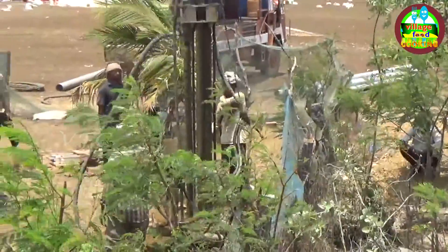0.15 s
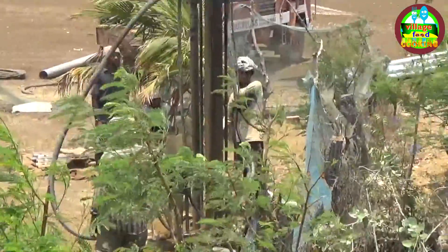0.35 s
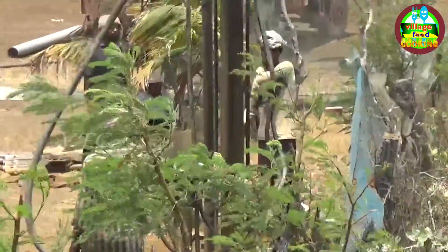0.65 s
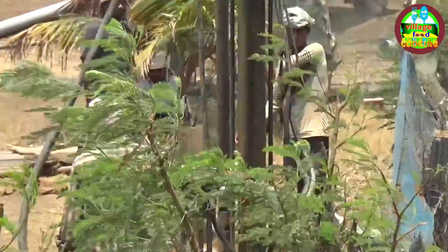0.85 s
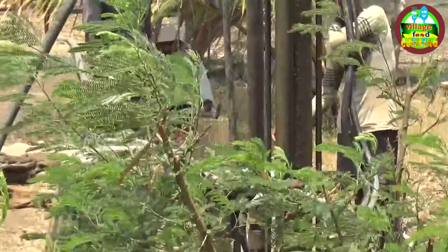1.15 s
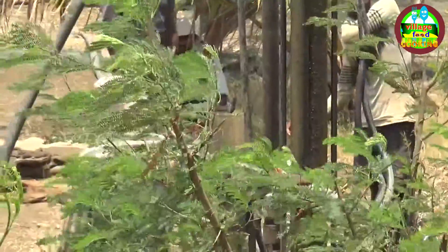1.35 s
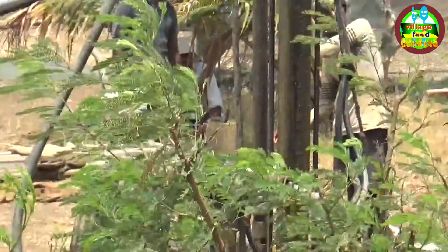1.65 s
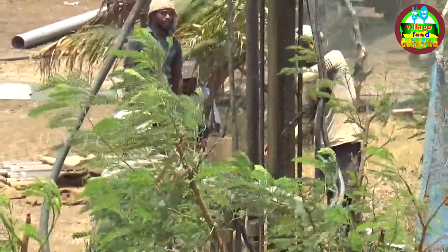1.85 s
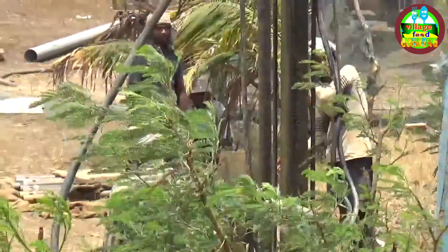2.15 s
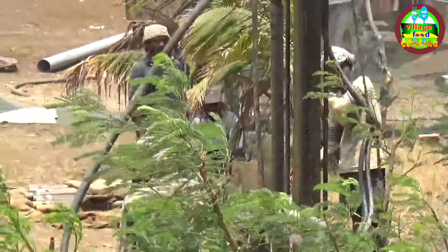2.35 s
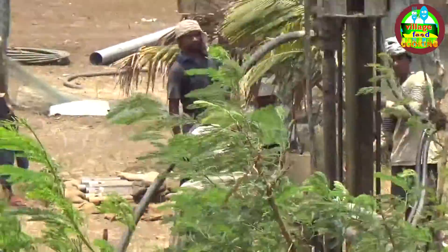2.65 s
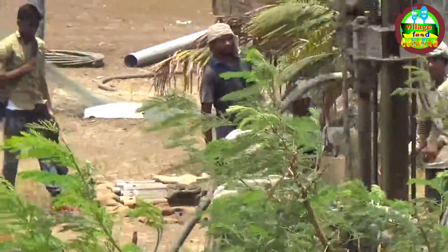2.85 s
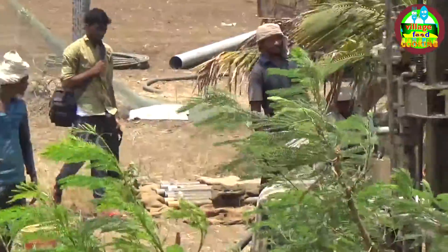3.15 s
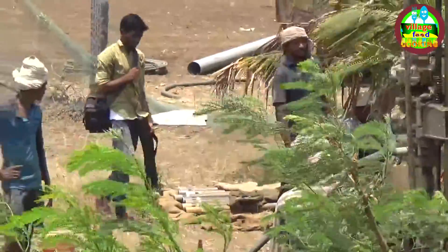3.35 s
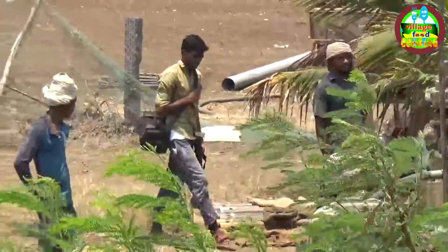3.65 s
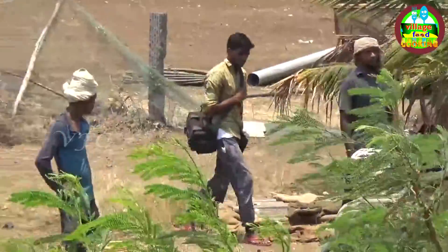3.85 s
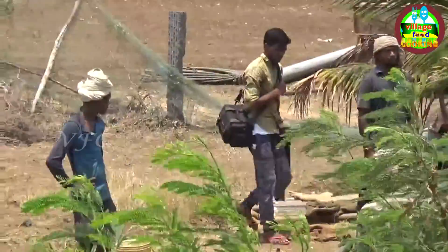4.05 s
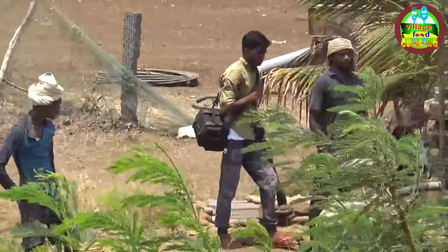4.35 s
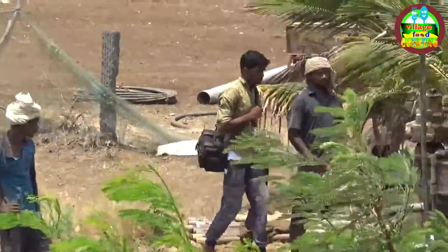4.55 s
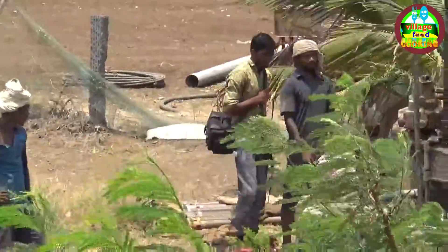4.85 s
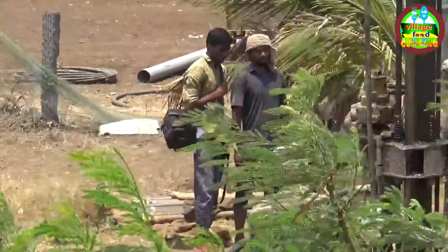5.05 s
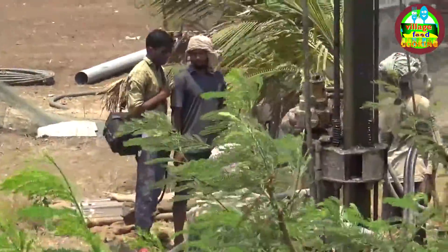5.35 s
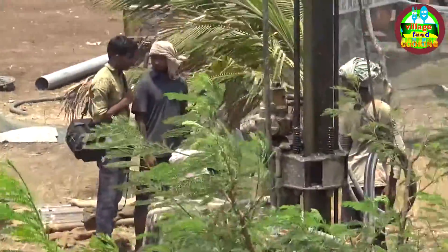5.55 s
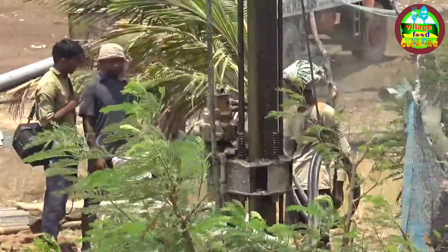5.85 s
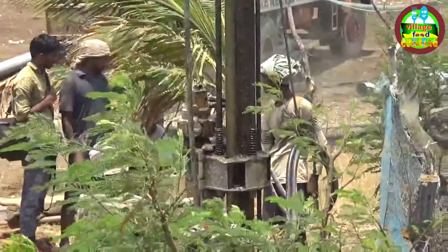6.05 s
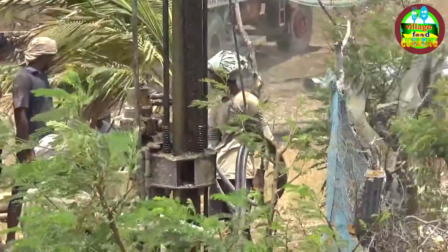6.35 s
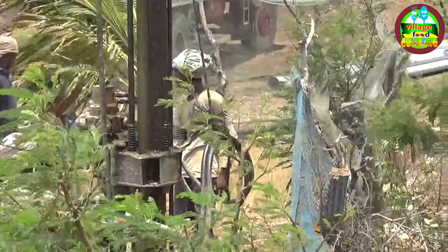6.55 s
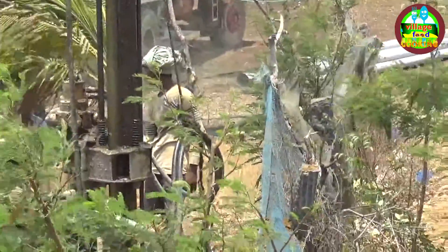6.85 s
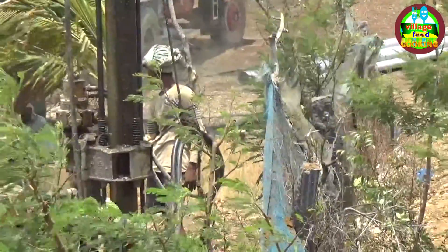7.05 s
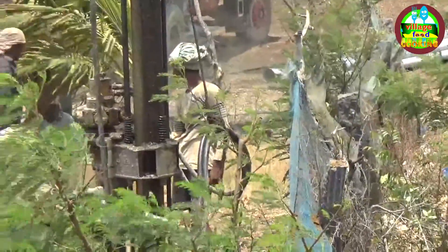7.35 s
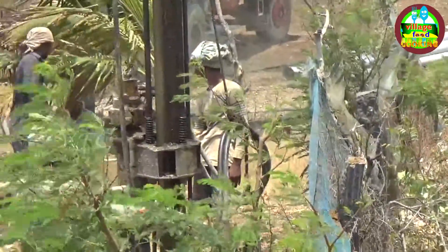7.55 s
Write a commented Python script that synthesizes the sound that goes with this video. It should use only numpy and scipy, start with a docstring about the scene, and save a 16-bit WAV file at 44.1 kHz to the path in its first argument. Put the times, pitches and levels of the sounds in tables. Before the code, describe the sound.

A drilling rig blows off air in long and short hissing blasts, its valve squeaking between them while a diesel engine drones behind.

```python
"""Drilling rig blowing off air

Outdoors, a truck-mounted rig heard through a close pair of microphone ports. Compressed air blows off
in long and short blasts, the valve squeaking as it seats, with spits of air, ratchet ticks and a bump.
Behind it drone a diesel engine and its screw compressor, sunk under each blast by the recorder's gain
control. An insect chirps nearby and light wind touches the ports."""
import sys
import numpy as np
from scipy import signal
from scipy.fft import rfft, irfft
from scipy.io import wavfile
from scipy.ndimage import uniform_filter1d

SR = 44100
rng = np.random.default_rng(int(sys.argv[2]) if len(sys.argv) > 2 else 0)


def transcribe(signal):
    """Save signal, clipped to [-1, 1], as a 16-bit WAV file at the path in sys.argv[1]."""
    frames = np.atleast_2d(signal).T
    limited = np.clip(frames, -1, 1)
    pcm = np.round(limited * 32767).astype(np.int16)
    wavfile.write(sys.argv[1], SR, pcm)


N = 339570

# how alike noise is at the two ports: frequency_hz, correlation
PORT_LIKENESS = [(50, .85), (130, .9), (250, .8), (630, .92), (1600, .86), (4000, .88), (8000, .95),
                 (11000, .98)]
# phase lead of the left port: frequency_hz, lead_rad
LEFT_LEAD = [(20, .1), (110, .45), (250, .9), (400, 1.1), (1000, 1.05), (1600, .9), (2500, .6), (4000, .57),
             (6000, .3), (8000, .1), (11000, .09)]
# how much louder noise is at the left port: frequency_hz, difference_db
LEFT_TILT = [(2500, 0), (5500, 1.4), (8000, 0)]

# wind on the microphone: time_s, level_db
WIND_LEVEL = [(0, -59), (2.7, -57), (3.2, -50), (4.6, -58), (4.95, -45), (5.8, -44), (6.25, -36),
              (6.5, -36), (6.7, -37), (7, -41), (7.3, -38.5), (7.55, -39), (7.7, -39)]
# colour of its rumble: frequency_hz, density_db
WIND_SPECTRUM = [(15, -20), (30, -10), (60, -1), (100, -1), (200, -5), (300, -10), (500, -40)]

DRONE_DB = -32  # engine, compressor, roar and insect levels are relative to this
FIRING_HZ, FIRING_DB, ROTOR_DB, ROAR_DB = 108.1, -3, -4, 1
# lobe rate of the screw compressor: time_s, pitch_hz
ROTOR_PITCH = [(0, 155.3), (1.3, 155.4), (3.4, 155.7), (6.3, 154.7), (7.7, 154.8)]
# its harmonics: multiple, level_db
ROTOR_HARMONICS = [(1, 0), (2, -15.5), (3, -9), (4, -3), (5, -5), (6, -10), (7, -19), (8, -15.5), (9, -14)]
# broad roar of the machinery: frequency_hz, density_db
ROAR_SPECTRUM = [(24, -63), (40, -31), (79, -17.5), (118, -8), (168, -9.5), (202, -10), (364, -18),
                 (625, -9), (933, -16.5), (1050, -20.5), (1240, -19), (2440, -25.5), (5830, -34),
                 (9550, -29.5), (11000, -33), (14300, -61), (22000, -120)]
# humps the casing puts in the roar: centre_hz, width_hz, gain_db
CASING_HUMPS = [(1380, 450, 2.5), (2080, 500, 5.5), (3380, 1100, 4)]
# roar and upper harmonics against the low tones: time_s, gain_db
UPPER_BALANCE = [(0, -2.5), (.6, -1), (2, -1.5), (3, -2), (4.9, -1), (5.8, -3), (6.3, -5), (7.7, -5)]

# the nearby insect grows louder: time_s, level_db
INSECT_LEVEL = [(0, -26), (2, -22), (4.2, -18), (5.2, -14), (7.7, -15)]
INSECT_HZ = 9370
CHIRP_AT_S, CHIRPS_PER_S, QUICKENING = 5.745, 16.6, .5  # one chirp's time, rate there, rate gained per s

# ratchet ticks: start_s, level_db
RATCHET_TICKS = [(3.486, -33), (3.5588, -27.5), (3.6287, -29), (3.6995, -25), (3.7696, -27)]
# ring of the pawl: pitch_hz, level_db, t60_s
PAWL_MODES = [(2220, 0.5, 0.05), (2620, -2, 0.027), (3100, 0.5, 0.033), (3370, -3, .03)]
# one dull bump: start_s, length_s, pitch_hz, level_db
DULL_BUMP = (.69, .08, 245, -30)

# short spits of air: start_s, level_db, t60_s
AIR_SPITS = [(1.573, -29, 0.13), (1.6294, -38, 0.08), (4.2275, -38, 0.056), (4.5, -41, 0.072),
             (4.5215, -37.5, 0.077), (4.8638, -38, 0.081), (5.5682, -20, 0.093), (5.914, -35, 0.07),
             (6.1105, -36.5, 0.07), (6.1499, -42, 0.07), (6.246, -22, .03), (6.263, -19, .03)]
# their colour: frequency_hz, density_db
SPIT_SPECTRUM = [(880, -23), (1500, -6), (3070, -10), (3370, -12), (4550, -4.5), (7690, -10.5), (8290, -4),
                 (9080, 0), (11000, -15), (14300, -53), (22000, -120)]
# valve squeaks: start_s, level_db, pitch_hz, held_s, tail_t60_s
VALVE_SQUEAKS = [(3.42, -15, 8480, .02, .1), (3.453, -10, 8150, .022, .25), (3.835, -15, 8220, .03, .1),
                 (4.09, -15, 8120, .025, .23), (4.567, -22, 8270, .012, .1), (4.772, -16, 8150, .022, .23),
                 (5.262, -14, 8220, .02, .1), (5.292, -18, 8600, .04, .1), (5.432, -13, 8160, .035, .23),
                 (6.19, -49, 4200, .03, .05), (6.208, -41, 8400, .03, .05), (6.212, -43, 7550, .018, .05)]

# the outlet changes as the crew works the valve: start_s
OUTLET_STARTS = [0, .64, 1.7, 2.67, 3.48, 3.81, 5.9]
# broad colour of the jet, per outlet: frequency_hz, density_db
JET_SPECTRA = [
    [(350, -38), (800, -19.5), (1300, -20.5), (2600, -19.5), (5000, -10.5), (8000, -23.5), (10900, -13)],
    [(350, -38.5), (800, -21.5), (1300, -11.5), (2600, -9), (5000, -5.5), (8000, -3.5), (10900, -10)],
    [(350, -41), (800, -28.5), (1300, -25.5), (2600, -24), (5000, -11), (8000, -16.5), (10900, -2)],
    [(350, -49), (800, -29), (1300, -30.5), (2600, -26), (5000, -9.5), (8000, -18.5), (10900, -15)],
    [(350, -39), (800, -14), (1300, -15), (2600, -24.5), (5000, -14), (8000, -22.5), (10900, -8.5)],
    [(350, -49), (800, -21), (1300, -17), (2600, -25), (5000, -16), (8000, -16.5), (10900, -3.5)],
    [(350, -24), (800, -16.5), (1300, -14.5), (2600, -19.5), (5000, -14), (8000, -15), (10900, -14)],
]
# peaks and ripples in the hiss of the jet, per outlet: centre_hz, width_hz, gain_db
HISS_PEAKS = [
    [(2250, 650, 6.8), (2890, 280, 5.6), (4890, 460, 6.4), (5600, 260, 4.8), (6250, 250, 6.0),
     (6870, 440, 10.2), (7470, 420, 9.0), (8190, 670, 8.7), (9700, 2200, 15.3)],
    [(2080, 470, 3.6), (4290, 440, 6.9), (4950, 640, 12.2), (5590, 380, 11.5), (6890, 350, 7.7),
     (7550, 470, 12.9), (8090, 200, 7.9), (8780, 330, 6.0), (10230, 1620, 17.1)],
    [(2100, 600, 7.8), (3040, 880, 4.9), (4990, 230, 4.2), (5700, 370, 6.4), (6270, 340, 6.8),
     (6980, 370, 7.6), (7600, 520, 11.0), (8290, 700, 11.7), (9150, 610, 10.0), (9810, 670, 8.7)],
    [(2020, 1390, 8.9), (3040, 390, 6.0), (3590, 290, 3.4), (5020, 250, 4.3), (5700, 430, 6.8),
     (6290, 270, 5.6), (7030, 470, 10.0), (7620, 520, 12.4), (8290, 540, 12.2), (9030, 950, 11.6),
     (10270, 1660, 16.0)],
    [(2210, 790, 11.4), (2810, 220, 6.2), (3220, 400, 10.0), (4020, 390, 8.0), (4470, 400, 8.3),
     (5050, 430, 11.7), (5670, 370, 6.8), (6990, 390, 12.5), (7640, 770, 13.4), (8580, 720, 11.1),
     (10140, 930, 9.8)],
    [(2330, 830, 11.0), (3000, 460, 8.3), (3400, 300, 5.7), (4690, 1470, 12.6), (5760, 230, 4.9),
     (7110, 980, 9.3), (8520, 1030, 9.0), (10340, 900, 4.3)],
    [(2410, 720, 11.9), (3030, 190, 3.2), (3450, 620, 5.1), (4310, 520, 5.2), (5080, 650, 3.9),
     (5870, 220, 2.8), (6440, 280, 5.2), (7880, 220, 1.9), (8500, 1520, 6.1), (9910, 1650, 9.4)],
]
# dips where the ground reflection cancels the jet, per outlet: centre_hz, width_hz, gain_db
GROUND_DIPS = [
    [(2600, 150, -3)],
    [(6100, 200, -3)],
    [(6600, 150, -4)],
    [(6600, 160, -4), (8650, 150, -3)],
    [(9400, 250, -4)],
    [(6080, 200, -6), (4900, 130, -3), (9450, 200, -3)],
    [(6150, 150, -3)],
]
# air blasts: open_s, rise_s, peak_db, sag_db_per_s, throttle_from_s, throttle_db_per_s, shut_s,
# brightness_db_per_octave
AIR_BLASTS = [(-.3, .6, -5, 19, .65, 31, 1.29, .6), (1.834, .095, 3, 1, 3.28, 51, 3.462, -0.9),
              (3.4, .1, -28, -15, 3.717, -70, 3.845, 3.3), (3.815, .03, -8.5, 0, 4, 11, 4.1, 1.2),
              (4.536, 0.091, -6.5, 28, 4.6, 9, 4.782, 1.8), (5.216, .055, -11, 17, 5.4, 8, 5.468, 2.3),
              (5.5, .05, -47, -2, 6.15, -170, 6.27, 12), (6.248, .07, -14.5, -6, 7.05, 8, 7.8, 0.9)]
# the jet chokes briefly: start_s, length_s, depth_db
JET_CHOKES = [(.09, .06, 4), (4.542, .026, 5), (6.267, .006, 6), (7.522, .011, 5), (7.546, .021, 6),
              (7.574, .011, 7)]
# the pressure drops and returns: centre_s, half_width_s, depth_db
PRESSURE_LULL = (7.545, .08, 12)
SHUT_DB_PER_S, EMPTYING_DB, EMPTYING_DB_PER_S = 654, -25.5, 200  # quick cut, then the pipe empties
DULL_BELOW_DB, DULLING = -17, .4  # a weak jet dulls: dB per octave for each dB under this level

THRESHOLD_DB, SQUEEZE, SENSING_S = -19, 0.94, .008  # gain control; squeeze is the share of excess removed
QUICK_RELEASE_DB, CREEP_DB_PER_S, OPENING_CUT_DB = 8.5, 3.5, 10  # part lets go at once, the rest creeps
BAND_EDGE_HZ = 11030


def amp(db):
    """Decibels to gain."""
    return 10 ** (np.asarray(db) / 20)


def unit_rms(x):
    """Scales to rms 1."""
    return x / np.sqrt(np.mean(abs(x) ** 2) + 1e-20)


def at_hz(points, hz):
    """Reads a curve on a log frequency axis."""
    f, value = np.transpose(points)
    return np.interp(np.log(hz + 1), np.log(f + 1), value)


def at_time(points, t):
    """Reads a curve at times t."""
    return np.interp(t, *np.transpose(points))


def humps(bands, hz):
    """Bell-shaped peaks or dips in dB."""
    return sum(db * np.exp(-np.log(2) * (2 * (hz - centre) / width) ** 2) for centre, width, db in bands)


def drift(top_hz):
    """Random wander of rms 1 below top_hz."""
    return unit_rms(signal.lfilter(*signal.butter(2, top_hz / (SR / 2)), rng.standard_normal(N)))


def burst(start, held, t60, rise):
    """Envelope that rises, holds and dies away; times in seconds."""
    out, t = np.zeros(N), np.arange(0, held + 1.5 * t60, 1 / SR)
    part = out[round(start * SR):][:len(t)]
    part += (np.clip(t / rise, 0, 1) * amp(-60 * np.maximum(t - held, 0) / t60))[:len(part)]
    return out


def grid(size):
    """Bin frequencies and frame times of a short-time spectrum."""
    return np.fft.rfftfreq(size, 1 / SR), np.arange(4 * N // size + 5) * size / 4 / SR


def smoothed(field, bins, frames):
    """Blurs a short-time spectrum and scales it to rms 1."""
    return unit_rms(uniform_filter1d(uniform_filter1d(field, bins, axis=0), frames, axis=1))


def port_noise(gain, patchy_db, lasting_db, likeness=1):
    """Noise of rms 1 at both ports from a bins x frames gain, with brief patches and lasting ridges."""
    size = 2 * len(gain) - 2
    hz = grid(size)[0][:, None]
    a, b, c, d, patches, ridges = rng.standard_normal(gain.shape[::-1] + (6,)).T
    patches = smoothed(patches, bins=size // 100, frames=8)
    # reflections off the truck and the ground colour the sound in narrow bands that change slowly
    ridges = smoothed(ridges, bins=2, frames=60)
    alike = np.clip(likeness * at_hz(PORT_LIKENESS, hz), -1, 1)
    left, unrelated = a + 1j * b, c + 1j * d
    right = (alike * left + np.sqrt(1 - alike ** 2) * unrelated) * np.exp(-1j * at_hz(LEFT_LEAD, hz))
    tilt = amp(at_hz(LEFT_TILT, hz) / 2)
    spectra = np.array([left * tilt, right / tilt]) * gain * amp(patchy_db * patches + lasting_db * ridges)
    return unit_rms(signal.istft(spectra, nperseg=size, noverlap=size - size // 4)[1][:, :N])


def ports(x):
    """A point source reaches the two ports with a small phase lead on the left."""
    hz = np.fft.rfftfreq(N, 1 / SR)
    return np.array([x, irfft(rfft(x) * np.exp(-1j * at_hz(LEFT_LEAD, hz)), N)])


def wind(t):
    """Light wind makes a lumpy low rumble right at the microphone."""
    hz, frame_t = grid(2048)
    colour = np.outer(amp(at_hz(WIND_SPECTRUM, hz)), np.ones_like(frame_t))
    return port_noise(colour, patchy_db=3, lasting_db=0, likeness=.85) * amp(at_time(WIND_LEVEL, t))


def engine_and_compressor(t):
    """Diesel firing tone, compressor harmonics that waver over the distance, and a broad roar."""
    firing_phase = 2 * np.pi * np.cumsum(FIRING_HZ + 0.58 * drift(2.9)) / SR
    firing = np.sin(firing_phase) * amp(FIRING_DB + 0.79 * drift(6.8))
    lobe_phase = 2 * np.pi * np.cumsum(at_time(ROTOR_PITCH, t) + 0.12 * drift(3.1)) / SR
    harmonics = []
    for k, db in ROTOR_HARMONICS:
        waver_db = (1.08 + 0.37 * k) * drift(5.7)
        harmonics.append(amp(ROTOR_DB + db + waver_db) * np.sin(k * lobe_phase + 2 * np.pi * rng.random()))
    hz, frame_t = grid(2048)
    colour = np.outer(amp(at_hz(ROAR_SPECTRUM, hz) + humps(CASING_HUMPS, hz)), np.ones_like(frame_t))
    roar = amp(ROAR_DB) * port_noise(colour, patchy_db=1.0, lasting_db=1.5)
    low_tones = np.sqrt(2) * ports(firing + harmonics[0])
    upper = np.sqrt(2) * ports(sum(harmonics[1:])) + roar
    return amp(DRONE_DB) * (low_tones + amp(at_time(UPPER_BALANCE, t)) * upper)


def insect(t):
    """Near the microphone, wings pulse one high tone at a slowly quickening rate."""
    strokes = (t - CHIRP_AT_S) * (CHIRPS_PER_S + QUICKENING * (t - CHIRP_AT_S) / 2)
    wings = np.clip(np.cos(2 * np.pi * strokes), 0, 1) * amp(at_time(INSECT_LEVEL, t) + 2.5 * drift(6))
    tone = np.sin(2 * np.pi * INSECT_HZ * t + .5 * drift(60))
    return amp(DRONE_DB) * np.sqrt(2) * ports(wings * tone)


def bump(t):
    """One dull low tone swells and fades."""
    start, length, hz, db = DULL_BUMP
    progress = np.clip((t - start) / length, 0, 1)
    return ports(amp(db) * np.sin(np.pi * progress) * np.sin(2 * np.pi * hz * length * progress))


def ratchet():
    """The pawl rings briefly at each tick."""
    t, hits = np.arange(3000) / SR, np.zeros(N)
    for start, db in RATCHET_TICKS:
        hits[round(start * SR)] = amp(db)
    ring = sum(amp(db - 60 * t / t60) * np.sin(2 * np.pi * hz * t) for hz, db, t60 in PAWL_MODES)
    return ports(signal.oaconvolve(hits, ring)[:N])


def air_spits():
    """Brief escapes of air with a sharp start."""
    hz, frame_t = grid(256)
    colour = np.outer(amp(at_hz(SPIT_SPECTRUM, hz)), np.ones_like(frame_t))
    envelope = sum(amp(db) * burst(start, 0.0028, t60, rise=0.00096) for start, db, t60 in AIR_SPITS)
    return port_noise(colour, patchy_db=6.0, lasting_db=0.5) * envelope


def valve_squeaks(t):
    """Air through the nearly shut valve seat whistles, stops short and leaves a weak fluttering tail."""
    out = np.zeros(N)
    flutter = drift(70) + 1j * drift(70)
    for start, db, hz, held, t60 in VALVE_SQUEAKS:
        whistle = burst(start, held, t60=0.013, rise=0.0056) * (1 + 0.29 * flutter)
        tail = amp(-14) * burst(start, held, t60, rise=.004) * flutter
        out += amp(db) * ((whistle + tail) * np.exp(2j * np.pi * hz * t)).real
    return np.sqrt(2) * ports(out)


def air_flow(t):
    """Each blast ramps open, sags, is throttled and shuts; gives level (dB) and slope (dB per octave)."""
    blasts = []
    for opens, rise, peak_db, sag, throttle_from, throttling, shuts, _ in AIR_BLASTS:
        open_t, since_shut = np.minimum(t, shuts), np.maximum(t - shuts, 0)
        ramp = np.clip((t - opens) / rise, 0, 1) ** 0.93
        sag_db = sag * np.maximum(open_t - opens - rise, 0)
        throttle_db = throttling * np.maximum(open_t - throttle_from, 0)
        shutting = amp(-SHUT_DB_PER_S * since_shut) * (1 - amp(EMPTYING_DB))
        emptying = amp(EMPTYING_DB - EMPTYING_DB_PER_S * since_shut)
        blasts.append(ramp * amp(peak_db - sag_db - throttle_db) * (shutting + emptying))
    level_db = 10 * np.log10(np.sum(np.square(blasts), axis=0) + 1e-12)
    brightness = np.array(AIR_BLASTS)[np.argmax(blasts, axis=0), -1]  # set by the strongest blast
    dulled = DULLING * np.clip(level_db - DULL_BELOW_DB, -30, 0)
    centre, half_width, depth_db = PRESSURE_LULL
    lull_db = depth_db * np.exp(-((t - centre) / half_width) ** 2)
    return level_db - lull_db, brightness + dulled


def air_jet(t):
    """Turbulent jet noise: colour follows the outlet, level follows the flow, flutter shakes all bands."""
    hz, frame_t = grid(1024)
    outlets = np.array([amp(at_hz(colour, hz) + humps(peaks + dips, hz)) ** 2
                        for colour, peaks, dips in zip(JET_SPECTRA, HISS_PEAKS, GROUND_DIPS)])
    outlets *= hz < 11500
    treble = hz > 3000  # every outlet and frame is scaled to equal power in this band
    outlets /= outlets[:, treble].sum(1, keepdims=True)
    in_use = np.searchsorted(OUTLET_STARTS, frame_t, "right") - 1
    power = uniform_filter1d(outlets[in_use], size=13, axis=0).T  # outlets crossfade
    octaves = np.log2(np.maximum(hz, 1500) / 8000)[:, None]
    power = power * amp(octaves * air_flow(frame_t)[1]) ** 2
    jet = port_noise(np.sqrt(power / power[treble].sum(0)), patchy_db=1.24, lasting_db=2.2)
    choke_db = sum(db * np.clip((t - start) / length, 0, 1) ** 0.51 * (t < start + length)
                   for start, length, db in JET_CHOKES)
    flutter_db = 0.73 * drift(92.0) + 0.69 * drift(11.6)
    return jet * amp(air_flow(t)[0] + flutter_db - choke_db)


def scene():
    """All sources at the microphone."""
    t = np.arange(N) / SR
    blow_off = air_jet(t) + valve_squeaks(t) + air_spits()
    return blow_off + ratchet() + bump(t) + engine_and_compressor(t) + insect(t) + wind(t)


def record(dry):
    """Gain control holds the blasts down and so sinks the drone; peaks round off; top treble is cut."""
    pole = np.exp(-1 / (SENSING_S * SR))
    power_db = 10 * np.log10(signal.lfilter([1 - pole], [1, -pole], (dry ** 2).mean(axis=0)) + 1e-12)
    excess_db = SQUEEZE * (power_db - THRESHOLD_DB)
    creep_db = CREEP_DB_PER_S * np.arange(N) / SR
    held_db = np.maximum.accumulate(excess_db - QUICK_RELEASE_DB + creep_db)
    slow_db = np.maximum(held_db, OPENING_CUT_DB) - creep_db
    cut_db = uniform_filter1d(np.maximum(np.maximum(excess_db, slow_db), 0), size=400)
    rounded = .7 * np.tanh(dry / amp(cut_db) / .7)
    lowpass = signal.firwin(767, BAND_EDGE_HZ, window=("kaiser", 9), fs=SR)
    return signal.oaconvolve(rounded, lowpass[None], "same", axes=1)


dry = scene()
out = record(dry)
transcribe(out)
```